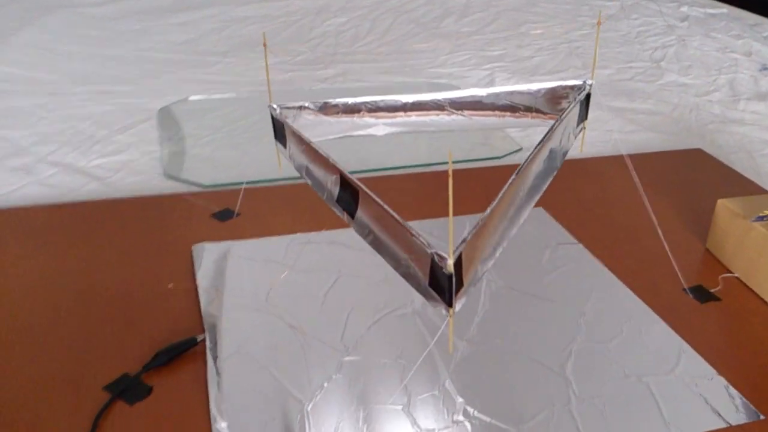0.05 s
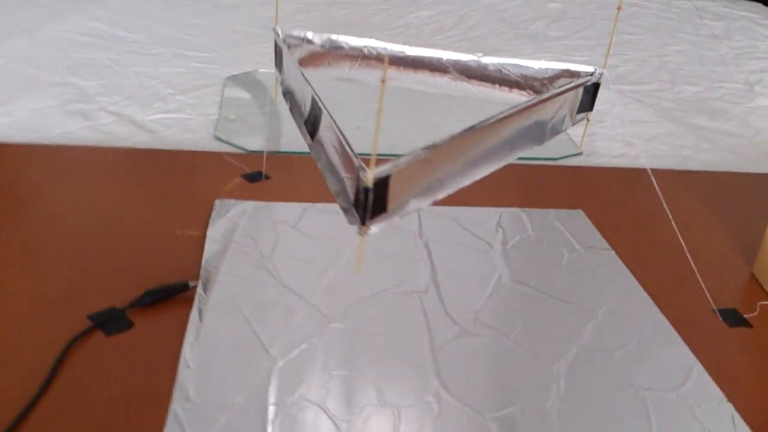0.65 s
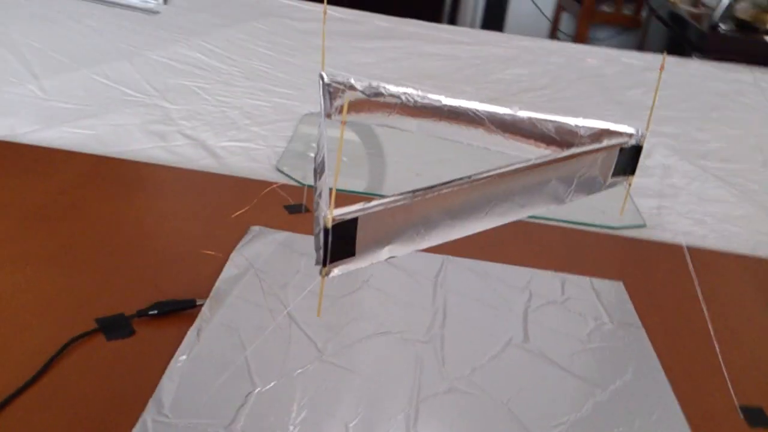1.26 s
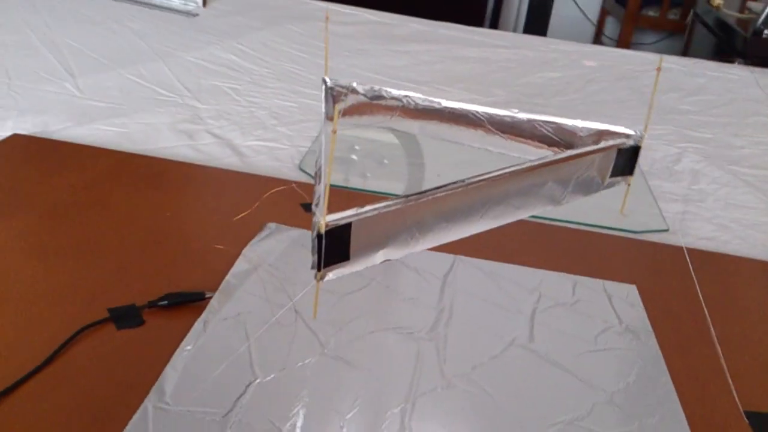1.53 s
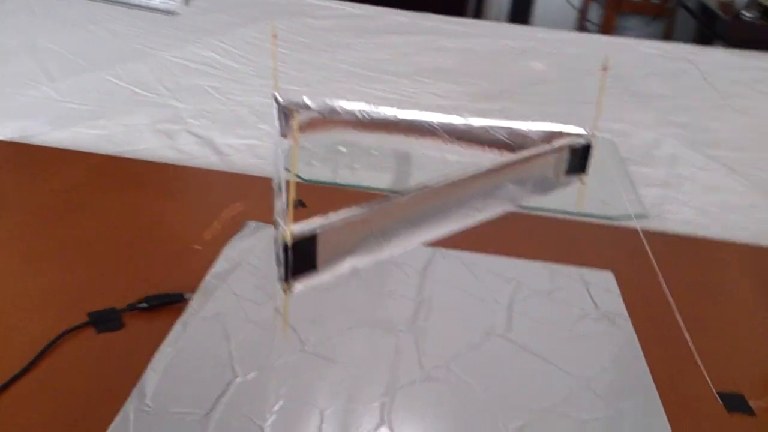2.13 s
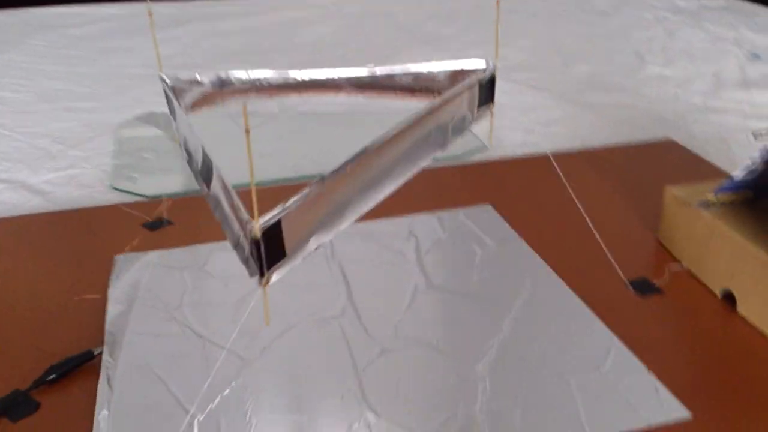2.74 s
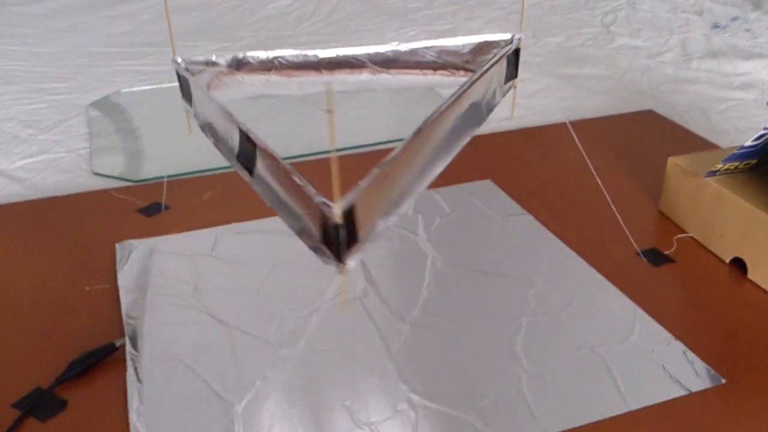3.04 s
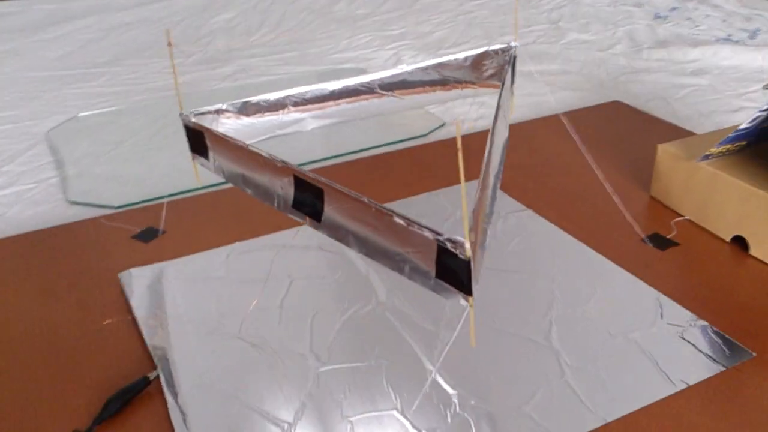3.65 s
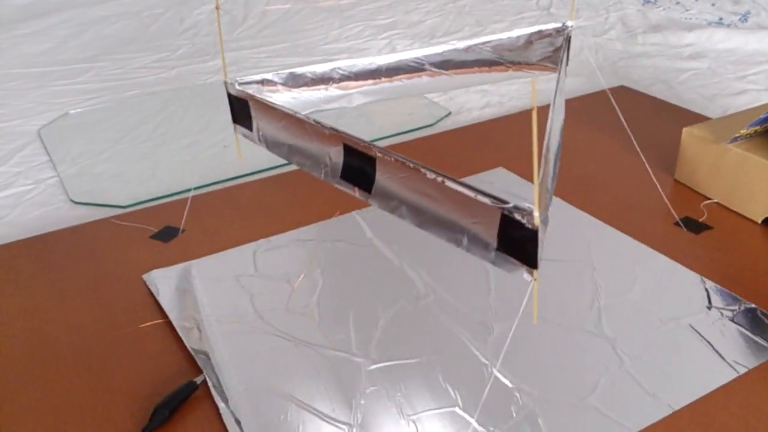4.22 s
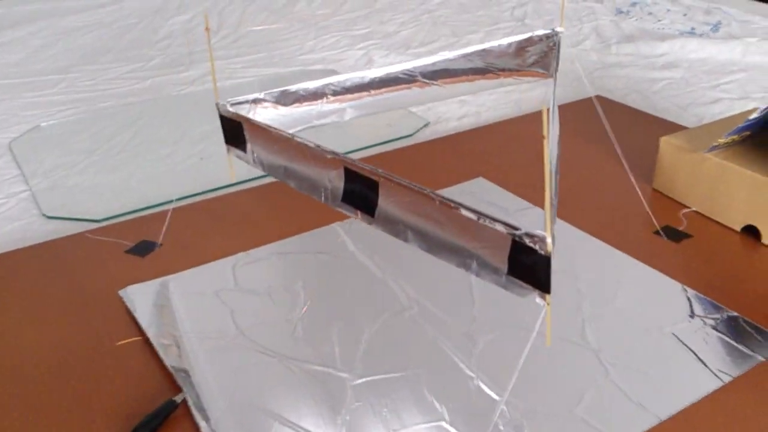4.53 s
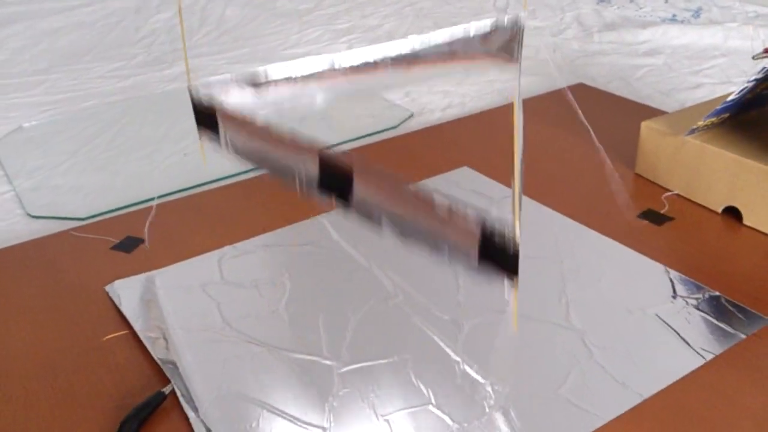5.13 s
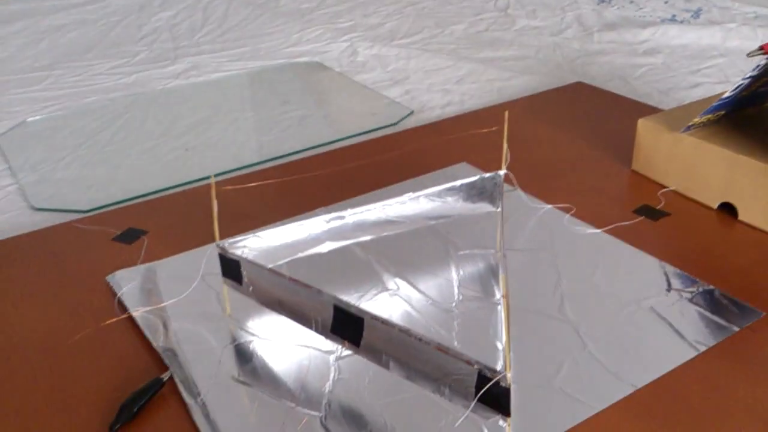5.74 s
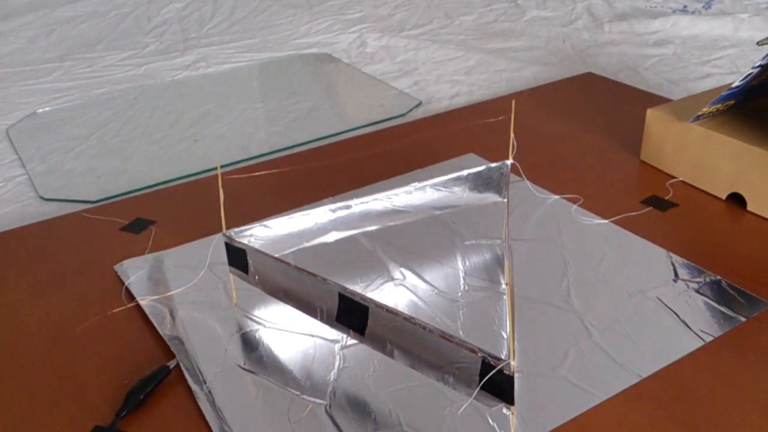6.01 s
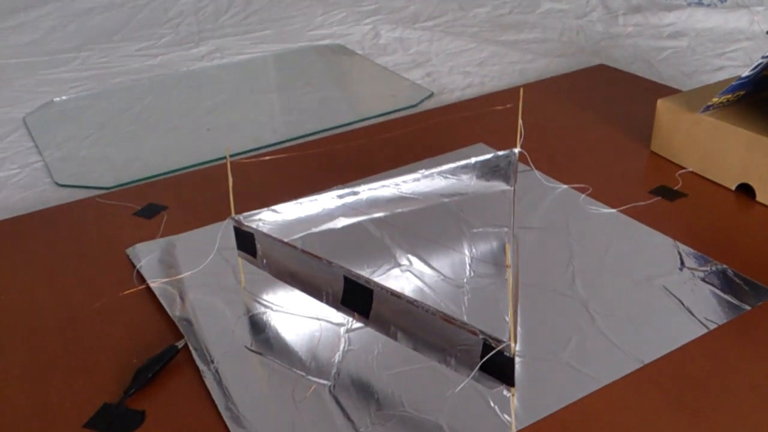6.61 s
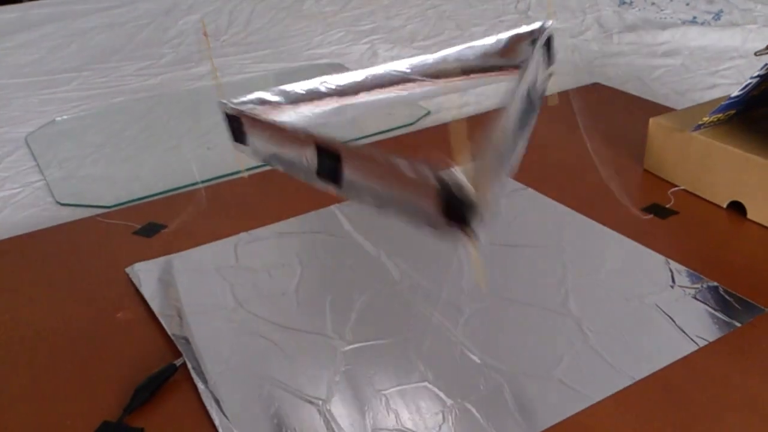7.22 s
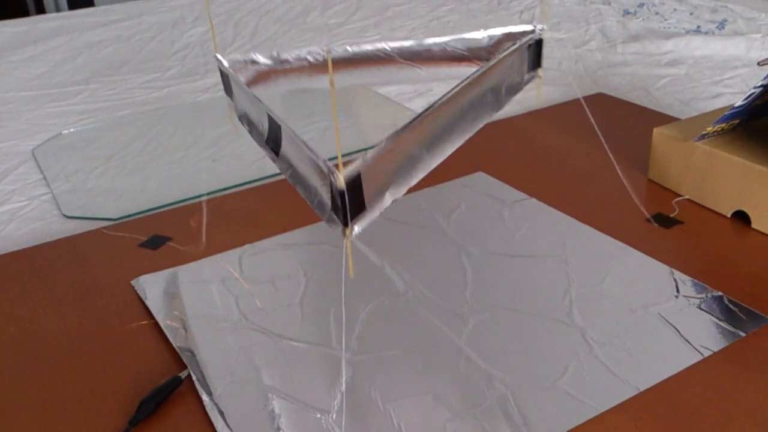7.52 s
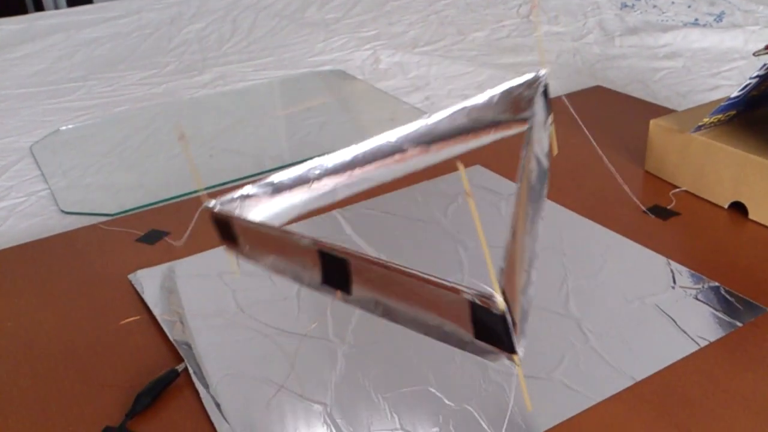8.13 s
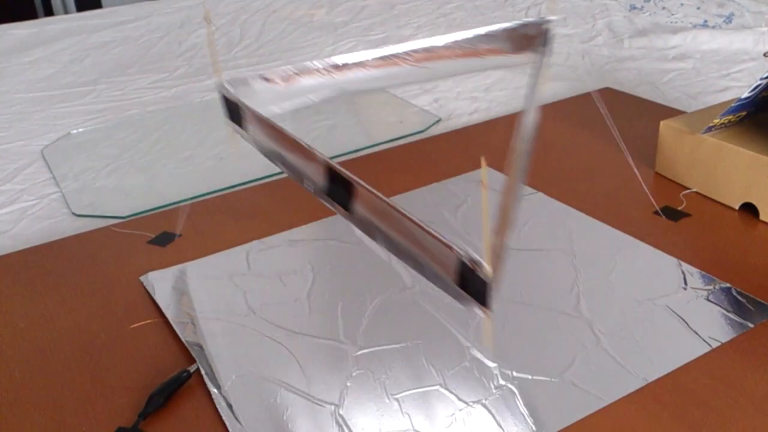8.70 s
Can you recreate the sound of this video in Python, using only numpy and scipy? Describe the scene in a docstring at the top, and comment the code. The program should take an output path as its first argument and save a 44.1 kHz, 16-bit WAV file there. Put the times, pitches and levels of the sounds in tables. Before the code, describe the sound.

Close up in a small room, a high-voltage wire hisses under a piercing, fluttering whine, with a soft wooden squeak and bump behind it. The power cuts with a click and a light foil frame lands on a table in a brief, crinkly clatter. Wood scrapes faintly in the lull. Then the discharge strikes again with a short squeal, and the hiss and whine carry on amid rapid crackling sparks.

```python
"""The corona wire of a foil ionocraft hovering over a table hisses and whines near 9 kHz.
Countless tiny discharges make the hiss; supply ripple modulates both hiss and whine.
The voltage is taken away with a click, and the frame drops and clatters on the table; then the
corona strikes again, now spitting sparks. Nearby, wood quietly squeaks, bumps and scrapes by
stick-slip friction. One close microphone hears it all in a small room."""
import sys
import numpy as np
from scipy import signal
from scipy.fft import rfft, irfft
from scipy.io import wavfile

SR = 44100
rng = np.random.default_rng(int(sys.argv[2]) if len(sys.argv) > 2 else 0)


def master_out(mix):
    """Clip the mix to full scale and print it as 16-bit PCM to the path in sys.argv[1]."""
    frames = np.transpose(np.atleast_2d(mix))
    ceiling = np.clip(frames, -1, 1)
    pcm = np.round(ceiling * 32767).astype(np.int16)
    wavfile.write(sys.argv[1], SR, pcm)


N = 395136
TIME = np.arange(N) / SR
ROOM_T60_S = 0.45
POWER_OFF_S, POWER_ON_S = 5.17, 6.945
HISS_FALL_DB_PER_S, WHINE_FALL_DB_PER_S = 197, 186


def undb(db):
    """Amplitude ratio of a level in decibels."""
    return 10 ** (np.asarray(db) / 20)


def unit(x):
    """Normalisation to rms 1."""
    return x / np.sqrt(np.mean(x ** 2))


def curve(rows):
    """Linear interpolation of (t/s, value) rows."""
    return np.interp(TIME, *np.transpose(rows))


def noise():
    """Gaussian white noise."""
    return rng.standard_normal(N)


def walk(rate):
    """Random fluctuation of rms 1, band-limited to about rate Hz."""
    return unit(irfft(rfft(noise()) * np.exp(-(np.fft.rfftfreq(N, 1 / SR) / rate) ** 2), N))


def tone(hz, phase_rad=0):
    """A sinusoid whose phase is the integral of its frequency, plus an offset."""
    return np.sin(2 * np.pi * np.cumsum(hz) / SR + phase_rad)


def grains(rate, spread_db):
    """Shot noise of rms 1: about rate impulses a second, of unequal size."""
    size = undb(spread_db * np.minimum(rng.exponential(size=N), 4))
    return unit((rng.random(N) < rate / SR) * size * np.sign(noise()))


def colour(x, points, size=4096):
    """Minimum-phase filter through (f/Hz, relative level/dB) points; white noise keeps its power."""
    hz, db = np.transpose(points)
    gain = undb(np.interp(np.log(np.fft.rfftfreq(size, 1 / SR) + 1), np.log(hz), db))
    cepstrum = irfft(np.log(gain))
    cepstrum[1:size // 2] *= 2
    cepstrum[size // 2 + 1:] = 0
    response = irfft(np.exp(rfft(cepstrum)))
    return signal.fftconvolve(x, response / np.linalg.norm(response))[:N]


def fade(start, t60):
    """Exponential decay from a sudden onset, 60 dB in t60 seconds."""
    age = TIME - start
    return (age >= 0) * np.exp(-np.log(1000) * np.maximum(age, 0) / t60)


def push(peak_s, attack_s, t60):
    """Linear growth of power to a peak, then exponential decay."""
    rise = np.sqrt(np.clip(1 + (TIME - peak_s) / attack_s, 0, 1))
    return rise * (TIME < peak_s) + fade(peak_s, t60)


def restarted(before, after):
    """A step from one value to another as the corona strikes again."""
    return np.where(TIME < POWER_ON_S, before, after)


def powered(fall_db_per_s):
    """Unit gain that decays exponentially while the voltage is off."""
    return restarted(undb(-fall_db_per_s * np.maximum(TIME - POWER_OFF_S, 0)), 1)


def room(x, wet_db):
    """Reverberation: the walls add a diffuse tail to the direct sound."""
    tail = (noise() * fade(0.0062, ROOM_T60_S))[:SR]
    return x + undb(wet_db) * signal.fftconvolve(x, tail / np.linalg.norm(tail))[:N]


def blows(rows, body, grain, wet_db):
    """Impact excitation: a body rings briefly, and its energy decays in the diffuse field."""
    direct = sum(undb(db) * fade(s, t60) for s, db, t60 in rows)
    diffuse_power = sum((undb(db) * fade(s + 0.0067, ROOM_T60_S)) ** 2 * t60 / ROOM_T60_S
                        for s, db, t60 in rows)
    return colour(grain * direct + undb(wet_db) * np.sqrt(diffuse_power) * noise(), body)


# Spectrum of the room air: f/Hz, relative level/dB
AIR_SPECTRUM = [(15, -50), (25, -14), (41, -12), (64, -4.5), (107, -5), (274, -8), (359, -11), (482, -13.5),
                (582, -12.5), (631, -14.5), (4750, -25.5), (12800, -25), (15500, -29.5)]

def air(rumble_db=-64.5, whistle_db=-82, whistle_hz=12800):
    """Ambient noise: a low rumble and a thin whistle with random frequency modulation."""
    whistle = tone(whistle_hz + 70 * walk(150))
    return undb(rumble_db) * colour(noise(), AIR_SPECTRUM) + undb(whistle_db) * whistle


# Soft low thuds: t/s, f/Hz, level/dB, 1/e half-width/s
THUDS = [(1.95, 156, -62, 0.093), (3.064, 98, -57, 0.02), (3.5, 88, -57, 0.054), (3.569, 202, -60, .035),
         (6.751, 60, -63.5, .1), (7.021, 65.6, -64, .1)]

def thuds():
    """Gaussian tone pulses: the smooth envelope keeps the band narrow, so there is no click."""
    return sum(undb(db) * np.exp(-((TIME - s) / width) ** 2) * np.sin(2 * np.pi * hz * (TIME - s))
               for s, hz, db, width in THUDS)


# Response of the wood: f/Hz, relative level/dB
WOOD_SPECTRUM = [(45, -10.5), (85, -6), (165, -8.5), (218, 7.5), (275, 0), (340, -11), (440, -3),
                 (520, -13), (620, -10), (730, -11.5), (950, -21), (1600, -33), (4000, -43)]
# Dull bumps: t/s, level/dB, T60/s
BUMPS = [(3.405, -44, 0.09), (3.416, -43, 0.15), (3.465, -55.5, 0.83)]
# Peaks of short shoves: t/s, level/dB
SHOVES = [(6.54, -53), (6.59, -56), (6.69, -54), (6.755, -52), (6.885, -54), (6.95, -55), (6.995, -55.5)]

def furniture(squeak_s=3.265, length_s=.17, squeak_hz=356, sink_hz_per_s=65, squeak_db=-51.5):
    """Stick-slip friction: sliding wood squeaks, bumps to a stop and later scrapes."""
    hz = squeak_hz - sink_hz_per_s * np.clip(TIME - squeak_s, 0, length_s)
    squeak = undb(squeak_db) * push(squeak_s + length_s, length_s, t60=0.4) * unit(tone(hz))
    drag_power = sum((undb(db) * push(s, attack_s=0.031, t60=0.52)) ** 2 for s, db in SHOVES)
    scrape = np.sqrt(drag_power) * colour(grains(rate=900, spread_db=0.5), WOOD_SPECTRUM)
    return squeak + scrape + blows(BUMPS, WOOD_SPECTRUM, noise(), wet_db=-1)


# Response of the switch body: f/Hz, relative level/dB
SWITCH_SPECTRUM = [(300, -20.5), (900, -8), (1800, -7.5), (3000, 0), (4200, -8), (6000, -20), (12000, -30)]
# Switch clicks: t/s, level/dB, T60/s
CLICKS = [(5.245, -40, 0.033), (6.319, -59.5, 0.063)]

def switch():
    """Damped transients: light impacts in a switch are heard as clicks."""
    return blows(CLICKS, SWITCH_SPECTRUM, noise(), wet_db=-4)


# Response of the foil frame: f/Hz, relative level/dB
FOIL_SPECTRUM = [(120, -19), (300, -21.5), (550, -7.5), (1000, -4), (1900, -2.5), (3000, -3.5),
                 (4200, -6.5), (6000, -3.5), (8000, -0.5), (10000, 5), (12000, -4.5), (15500, -19.5)]
# Contacts with the table: t/s, relative level/dB, T60/s
TOUCHDOWNS = [(5.3315, -24.5, 0.078), (5.342, -27, 0.044), (5.3475, -24.5, 0.039), (5.370, -39.5, 0.068),
              (5.598, -54, 0.033), (5.855, -65, .03)]

def landing():
    """Successive impacts: the corners touch down in turn and the foil crinkles."""
    crinkle = grains(rate=9000, spread_db=2)
    return undb(4) * blows(TOUCHDOWNS, FOIL_SPECTRUM, crinkle, wet_db=-4)


# Spectrum of a spark: f/Hz, relative level/dB
SPARK_SPECTRUM = [(400, -17), (1200, -2.5), (2000, -2), (4500, 0), (7000, 1.5), (10000, 10), (12500, -4.5),
                  (15500, -24)]
# Strong spits, each a cluster of sparks: t/s, level/dB
STRONG_SPITS = [(6.945, -36.5), (6.954, -35), (6.964, -37.5), (6.982, -39), (6.988, -41), (7.023, -37.5),
                (7.247, -34.5), (7.286, -35), (7.518, -37), (7.587, -40), (7.621, -37), (7.726, -38),
                (7.793, -36.5), (7.862, -41.5), (8.101, -35), (8.131, -38), (8.279, -38), (8.654, -34),
                (8.686, -35.5)]
SPIT_START_S = 7.11

def sparks(period_s=.0342, jitter_s=.002, weak_db=-43.5, scatter_db=0.5):
    """Relaxation oscillation: the wire charges and spits almost evenly, weakly between strong spits."""
    beats = np.arange(SPIT_START_S, N / SR, period_s)
    chance = rng.standard_normal((len(beats), 2))
    weak_spits = [(s + jitter_s * late, weak_db + scatter_db * size)
                  for s, (late, size) in zip(beats, chance)
                  if min(abs(s - strong) for strong, _ in STRONG_SPITS) > period_s / 2]
    bursts = sum(undb(db) * fade(s, t60=0.04) for s, db in STRONG_SPITS + weak_spits)
    snaps = grains(rate=9000, spread_db=2.3)
    return room(colour(bursts * snaps, SPARK_SPECTRUM), wet_db=-10)


def upper_whine(base_hz=10080, wander_hz=290, glide_hz=800, glide_s=.04, rough_rad=2.1):
    """Phase modulation: another stretch of wire whines hoarsely, squeals at the strike, then wanders."""
    hz = base_hz + restarted(0, wander_hz * (1 + np.tanh(walk(2))))
    gain = powered(WHINE_FALL_DB_PER_S) * undb(restarted(-60, -63.5))
    sustained = gain * unit(tone(hz, rough_rad * walk(170)))
    squeal_hz = base_hz + glide_hz * np.clip((TIME - POWER_ON_S) / glide_s, 0, 1)
    squeal = undb(-38.5) * fade(POWER_ON_S, t60=0.19) * unit(tone(squeal_hz, rough_rad * walk(170)))
    return room(sustained + squeal, wet_db=-10)


# Spectra of the broad hiss and the high sizzle: f/Hz, relative level/dB
HISS_SPECTRUM = [(210, -60), (350, -24), (710, -13), (1050, -8), (1280, -7), (1910, -12), (2730, -7),
                 (3770, -9.5), (4540, -6.5), (6170, -7.5), (7440, -5.5), (8500, -12), (11000, -40),
                 (18700, -120)]
SIZZLE_SPECTRUM = [(6500, -32.5), (7800, -8), (8600, -1), (9500, 1), (10100, 0), (11000, -5),
                   (12300, -11.5), (14000, -19), (15500, -26)]
# Envelope of the hiss after the restart: t/s, relative level/dB
HISS_RESTART = [(7.07, -52), (7.13, -49.5), (7.24, -48.5), (7.4, -54), (7.62, -53), (7.8, -49), (7.89, -56),
                (7.96, -48.5), (8.55, -51), (8.96, -47.5)]

def corona_hiss(sag, sway_db, rise_db_per_s=0.2142, lull_s=0.016, lull_db=-3.5):
    """Shot noise: tiny discharges hiss and sizzle in step with the supply; a few stand out as crackle."""
    current = (1 - 0.39 * sag) * undb(.5 * walk(39))
    hiss, sizzle = (colour(unit(grains(rate=22000, spread_db=3) * current), spectrum)
                    for spectrum in (HISS_SPECTRUM, SIZZLE_SPECTRUM))
    # sparks come in flurries and take their share of the current from the hiss
    flurries = unit(grains(rate=2000, spread_db=6.5) * undb(3.3 * np.tanh(walk(33))) * current)
    crackle = colour(flurries, SPARK_SPECTRUM)
    share = undb(restarted(-9.5, 1))
    discharge = (undb(1) * hiss + share * crackle) / np.sqrt(1 + share ** 2)
    discharge_db = restarted(-52.5 + rise_db_per_s * TIME + sway_db, curve(HISS_RESTART))
    sizzle_db = restarted(-46.5, -48.1) + sway_db
    rush = undb(discharge_db) * discharge + undb(sizzle_db) * sizzle
    # the hiss falls back while charge builds up for a strong spit
    lull = sum((TIME >= s - lull_s) * (TIME < s) for s, _ in STRONG_SPITS if s > SPIT_START_S)
    return room(powered(HISS_FALL_DB_PER_S) * undb(lull_db * lull) * rush, wet_db=-10.5)


def corona_whine(sag, level_db, leap_hz=500, flutter_db=2.1, onset_s=0.048):
    """Amplitude and frequency modulation: at each supply sag the wire's tone weakens and leaps up."""
    leap = sag ** 2
    swing_hz = leap_hz * (1 + .28 * np.tanh(walk(4)))  # varies as the craft sways
    hz = restarted(8998, 9014) + swing_hz * (leap - leap.mean())
    wander_rad = restarted(.37, .75) * (walk(25) + .8 * walk(160))  # calm, then restless
    singing = (1 - .48 * sag) * undb(flutter_db * walk(110)) * tone(hz, wander_rad)
    onset = np.clip((TIME - POWER_ON_S) / onset_s, 0, 1) ** 2
    gain = powered(WHINE_FALL_DB_PER_S) * restarted(0.95, onset) * undb(level_db + 1.3)
    return gain * unit(room(singing, wet_db=-9))


# Envelope of the whine as the craft sways, first hover and restart: t/s, relative level/dB
WHINE_HOVER = [(0.0, -45), (0.24, -40.5), (0.66, -43), (0.72, -47.5), (0.95, -44.5), (1.45, -44.5),
               (1.5, -41), (2.84, -44.5), (2.85, -46.5), (2.97, -42.5), (3.31, -42), (3.37, -39),
               (3.57, -39), (3.86, -36), (4.05, -39), (4.19, -37), (4.75, -44.5), (5.17, -38)]
WHINE_RESTART = [(6.98, -38.5), (7.018, -42.5), (7.178, -46), (7.228, -39.5), (7.266, -45), (7.448, -41.5),
                 (7.536, -47.5), (7.828, -49.5), (7.978, -39.5), (8.032, -45.5), (8.386, -38),
                 (8.594, -45.5), (8.876, -39.5), (8.96, -47)]

def corona(ripple_hz=100.05, usual_whine_db=-42):
    """Corona discharge under ripple: the rectified supply sags twice a mains cycle, chopping the sound."""
    cycles = ripple_hz * TIME - .14 + .04 * walk(30)
    sag = (.5 + .5 * np.cos(2 * np.pi * cycles)) ** 9  # 0 full voltage, 1 deepest sag
    whine_db = restarted(curve(WHINE_HOVER), curve(WHINE_RESTART))
    sway_db = 0.16 * (whine_db - usual_whine_db)  # the hiss follows the whine a little
    return corona_hiss(sag, sway_db) + corona_whine(sag, whine_db)


def scene():
    """Superposition at one microphone, the same in both channels."""
    mono = corona() + upper_whine() + sparks() + landing() + switch() + furniture() + thuds() + air()
    return np.array([mono, mono])


def record(dry, low_hz=42, top_hz=15550, ceiling=.3):
    """Band limiting and saturation: the deepest bass is lost, peaks are rounded and the top is cut."""
    thin = signal.sosfilt(signal.butter(4, low_hz, "high", fs=SR, output="sos"), dry)
    rounded = ceiling * np.tanh(thin / ceiling)
    return signal.sosfilt(signal.ellip(10, .2, 70, top_hz, fs=SR, output="sos"), rounded)


dry = scene()
out = record(dry)
master_out(out)
```